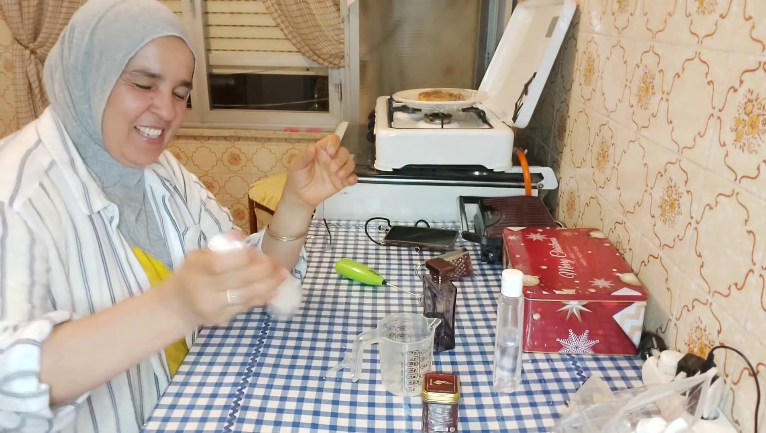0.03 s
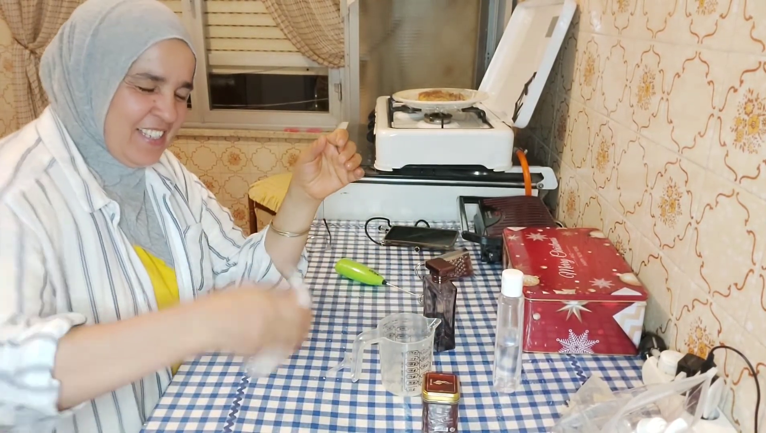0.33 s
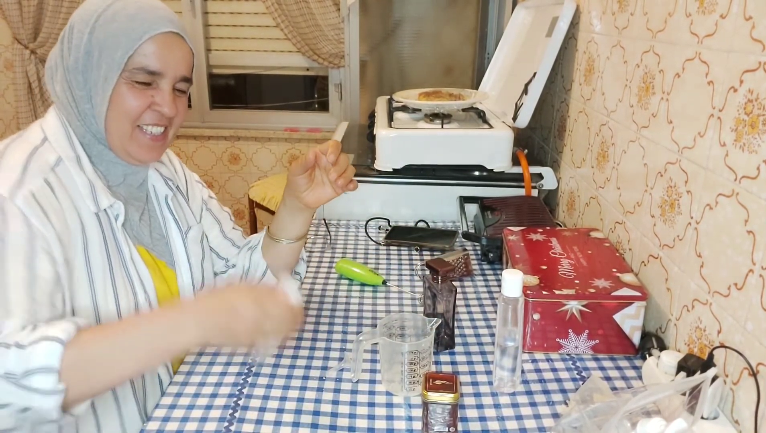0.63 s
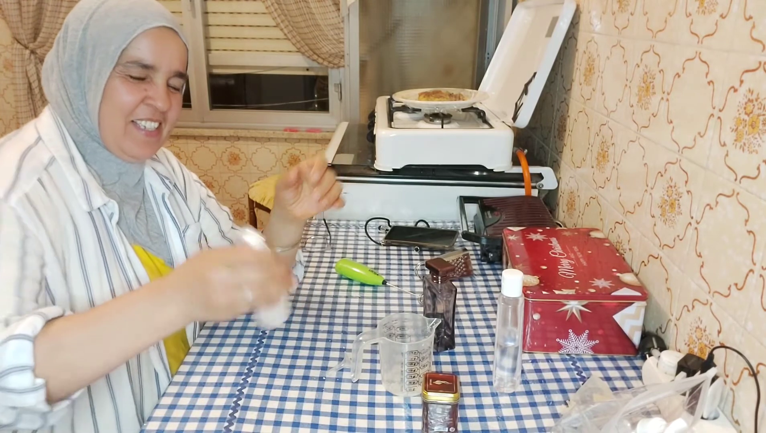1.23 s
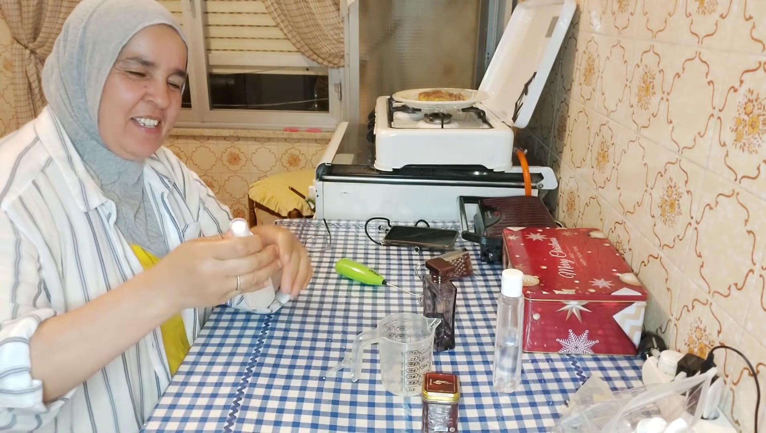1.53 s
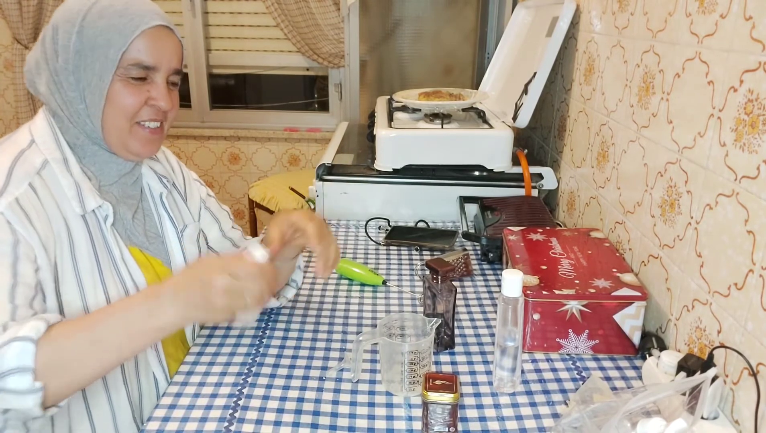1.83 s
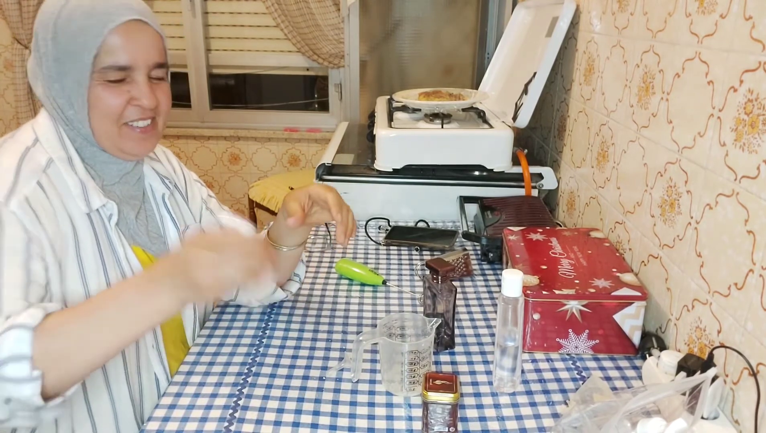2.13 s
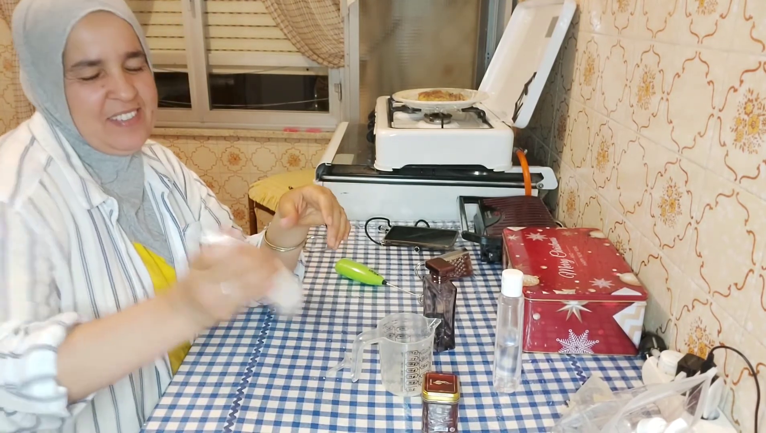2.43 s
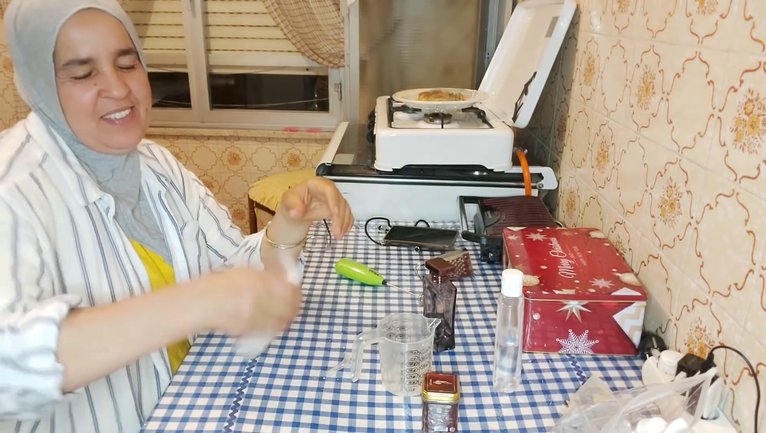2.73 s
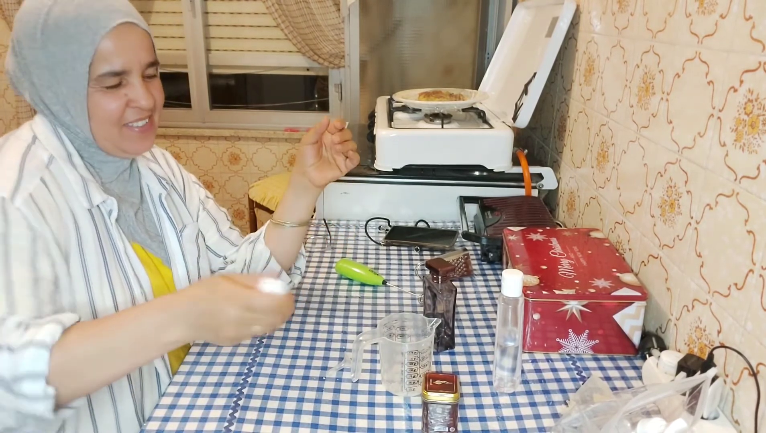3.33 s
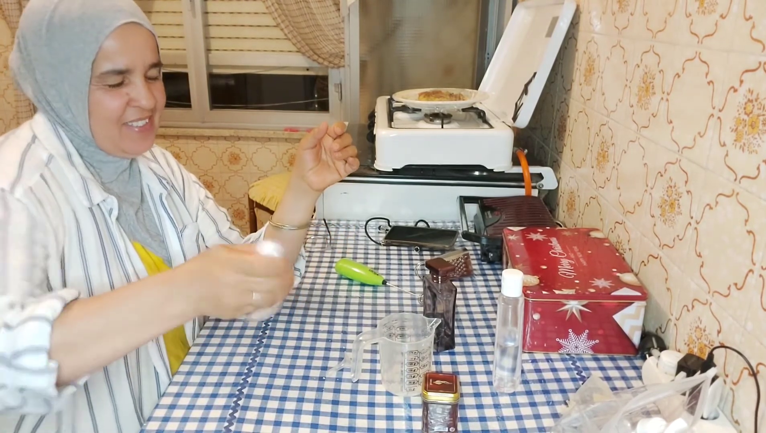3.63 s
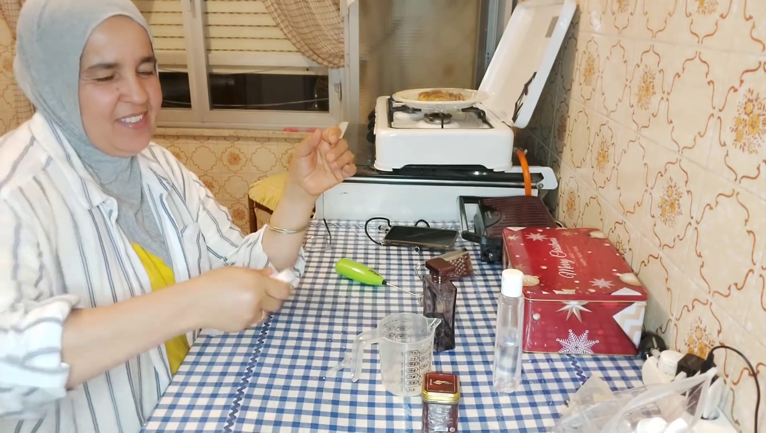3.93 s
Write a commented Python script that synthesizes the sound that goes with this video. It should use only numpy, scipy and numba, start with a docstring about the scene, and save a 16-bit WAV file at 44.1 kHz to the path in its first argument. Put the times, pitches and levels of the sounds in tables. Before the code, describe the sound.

Liquid sloshes sharply in a small shaken plastic bottle, pausing once, in a kitchen.

```python
"""Sharp sloshes, about four a second with one pause: a small plastic bottle of liquid shaken by hand.
At each turn the liquid surges against an end: it slaps, churns into bubbles and sprays the wall,
while the trapped air gulps. In the pause, fingers rub the plastic. The bottle is a little right of
a stereo microphone pair in a hard-walled kitchen, far enough off for the room's short ring to be
about as loud as the direct sound. Behind it lie a low rumble and a faint mains hum."""
import sys
import numpy as np
from scipy import signal
from scipy.fft import rfft, irfft
from scipy.io import wavfile
from scipy.ndimage import map_coordinates
from numba import njit

SR = 44100
rng = np.random.default_rng(int(sys.argv[2]) if len(sys.argv) > 2 else 0)


def dump_mix(stems):
    """Bounce the given channels to the path in sys.argv[1] as a 16-bit WAV at rate SR."""
    frames = np.atleast_2d(stems).T  # one column per channel
    limited = np.clip(frames, -1, 1)  # hard clip at full scale
    pcm = np.round(limited * 32767).astype(np.int16)
    wavfile.write(sys.argv[1], SR, pcm)


N = 176400

# surges of liquid against an end: (time [s], rise [s], length [s], churn level [dB], spray level [dB])
LIQUID_SURGES = [(0.0, 0.00067, 0.016, -43, -46.5), (0.116, .002, 0.073, -50.5, -51),
                 (0.222, .002, 0.028, -46.5, -50.5), (0.35, 0.0036, 0.1, -52, -50),
                 (.433, 0.012, 0.051, -44, -49.5), (0.573, 0.0056, 0.054, -53, -51),
                 (0.613, .006, 0.036, -51, -54), (0.652, 0.0017, 0.064, -47.5, -46.5),
                 (0.801, .003, 0.063, -48.5, -48.5), (0.882, 0.0018, 0.062, -47, -45.5),
                 (1.026, 0.0039, 0.027, -48.5, -46), (1.065, 0.0055, 0.032, -49, -54),
                 (1.105, 0.0023, 0.051, -43, -47.5), (1.229, 0.016, 0.079, -50.5, -55),
                 (1.331, 0.014, 0.048, -50, -57), (2.022, 0.0044, 0.025, -50.5, -58.5),
                 (2.071, .002, 0.097, -48, -52.5), (2.237, 0.0096, 0.052, -46, -48.5),
                 (2.316, 0.0056, 0.068, -45, -48.5), (2.472, 0.0037, 0.081, -48, -49.5),
                 (2.544, 0.028, 0.078, -44.5, -48), (2.712, .014, 0.082, -45, -49),
                 (2.8, 0.0083, 0.067, -45, -51.5), (2.957, 0.013, 0.07, -48, -51),
                 (3.051, 0.0034, 0.046, -46.5, -49), (3.203, 0.0056, 0.088, -49.5, -56),
                 (3.312, .003, .055, -48.5, -56.5), (3.445, .002, 0.038, -59, -56),
                 (3.482, .002, 0.029, -53, -53.5), (3.524, 0.0053, 0.088, -45.5, -53.5),
                 (3.634, 0.014, 0.096, -53.5, -73), (3.671, 0.013, 0.055, -46.5, -50),
                 (3.763, 0.0018, 0.042, -43.5, -48.5), (3.837, 0.011, 0.034, -52, -59),
                 (3.909, 0.0018, 0.15, -47.5, -47)]
# colour of the churning bubbles: (frequency [Hz], relative band level [dB])
CHURN_COLOUR = [(250, -16), (420, -12), (650, -5.5), (900, -11), (1300, -8.5), (1800, 0.5), (2300, 1.5),
                (2800, -3.5), (3700, 0), (5000, -2), (7000, -9.5)]
# colour of the spray on the wall: (frequency [Hz], relative band level [dB])
SPRAY_COLOUR = [(2000, -0.5), (3500, -5), (5000, 0.5), (6100, -3.5), (7300, 1), (9000, -0.5), (12500, -3.5),
                (15000, -52.5)]
# slaps on the wall and ticks of single drops: (time [s], relative level [dB], pitch [Hz])
WALL_SLAPS = [(0.119, -43.5, 7150), (.205, -38, 842), (.208, -34.5, 2000), (0.227, -53, 2350),
              (.226, -40, 860), (0.351, -47, 2130), (.436, -46, 2280), (0.456, -43.5, 2400),
              (.582, -47.5, 7260), (0.645, -35, 2290), (.646, -43, 900), (0.658, -39, 3800),
              (.680, -38, 1620), (.712, -46, 5000), (.806, -44, 870), (0.879, -44, 2900),
              (.888, -36.5, 1670), (1.035, -44.5, 1560), (1.073, -41, 2260), (1.111, -37, 1620),
              (1.127, -60, 1800), (1.344, -52.5, 6500), (1.437, -63, 2220), (2.066, -43, 2050),
              (2.333, -39.5, 1890), (2.345, -37.5, 3530), (2.477, -48, 1030), (3.058, -44, 2720),
              (3.205, -47, 6500), (3.314, -44, 2570), (3.448, -55, 2070), (3.479, -59, 2340),
              (3.525, -49, 790), (3.644, -50, 7160), (3.677, -46.5, 8400), (3.853, -51.5, 9000),
              (3.765, -56, 1930), (3.766, -44.5, 704), (3.920, -34.5, 2240), (3.939, -43, 2250),
              (3.957, -51, 2150)]
# gulps of the air pocket: (time [s], length [s], level [dB], first pitch [Hz], last pitch [Hz])
AIR_GULPS = [(0.0, 0.018, -44, 844, 757), (.205, 0.026, -44.5, 884, 550), (.351, 0.1, -56.5, 580, 935),
             (.45, 0.045, -60.5, 478, 622), (0.606, 0.033, -54, 806, 872), (.645, 0.023, -47, 952, 821),
             (0.807, 0.0283, -47, 703, 616), (.86, 0.033, -52, 925, 765), (1.032, 0.079, -55.5, 780, 1070),
             (1.111, .03, -60, 1018, 877), (1.234, 0.043, -60, 760, 823), (2.025, 0.026, -52, 580, 585),
             (2.239, 0.042, -46, 643, 723), (2.276, 0.044, -52.5, 1122, 1188),
             (2.475, 0.045, -51, 648, 683), (2.499, 0.046, -56.5, 1023, 1195),
             (2.551, 0.039, -48, 935, 637), (2.727, 0.014, -47.5, 643, 686), (2.77, 0.15, -71, 1103, 792),
             (2.955, 0.073, -52.5, 626, 940), (3.197, 0.024, -53, 655, 744), (3.263, 0.074, -56, 1106, 769),
             (3.521, 0.032, -48, 742, 727), (3.558, 0.033, -55, 1000, 618), (3.684, 0.018, -47.5, 727, 779),
             (3.735, 0.068, -51, 920, 680)]
# hollow ring of the bottle: (frequency [Hz], width [Hz], gain [dB])
BOTTLE_RESONANCES = [(452, 72, -2), (897, 54, -11.5), (1832, 23, -14), (2348, 127, -9), (7260, 800, -3)]
# fingers on the plastic: (time [s], length [s], level [dB], pitch [Hz])
FINGER_RUBS = [(1.832, 0.063, -69.5, 1740), (1.876, 0.026, -69, 7000), (1.942, 0.042, -66.5, 4950)]
# how long the kitchen rings: (frequency [Hz], time to fall 60 dB [s])
ROOM_DECAY = [(250, 0.7), (1000, 0.26), (2500, 0.27), (7000, 0.28), (14000, 0.17)]
# how strongly the kitchen rings: (frequency [Hz], gain [dB])
ROOM_COLOUR = [(250, -8), (700, -4), (1200, -4), (2200, -1), (6000, -4.5), (14000, 1)]
# rumble and hiss of the room: (frequency [Hz], relative spectral density [dB])
ROOM_TONE_COLOUR = [(25, -42), (45, -7), (65, -6.5), (130, -4.5), (200, -11.5), (300, -3), (360, -1.5),
                    (415, 0.5), (470, -5), (560, -8.5), (700, -19.5), (1100, -24), (2000, -30), (5000, -37),
                    (8000, -38), (12000, -34.5), (15000, -33.5)]

SAG_DB_PER_S = 50   # slow fade of a surge or gulp while it lasts


def sloshing(drain_db_per_s=355):
    """Each surge of bubbles and spray rises fast, sags while the liquid runs, then drains."""
    power, t = np.zeros((2, N)), np.arange(SR // 3) / SR
    for start, rise, length, *levels in LIQUID_SURGES:
        shape = envelope(t, rise, length, drain_db_per_s)
        for layer, db in zip(power, levels):
            add(layer, start, (shape * from_db(db)) ** 2)
    churn_gain, spray_gain = np.sqrt(power)
    churn = bubbles(CHURN_COLOUR, per_s=4000, cycles=17.9, spread_db=4.0)
    spray = bubbles(SPRAY_COLOUR, per_s=5000, cycles=9.7, spread_db=3.5)
    return churn_gain * churn + spray_gain * spray


def bubbles(colour, per_s, cycles, spread_db, clumps_per_s=130, clump_db=1.9):
    """The liquid breaks in clumps into pops of uneven size, each with its own pitch; rms 1."""
    when, size_draw, pitch_draw = rng.random((int(per_s * N / SR), 3)).T
    low_hz, high_hz = colour[0][0], colour[-1][0]
    hz = low_hz * (high_hz / low_hz) ** pitch_draw
    size_db = spread_db * np.minimum(-np.log(size_draw), 4)   # many small, a few large
    sizes = from_db(size_db + at_hz(colour, hz)) * np.sqrt(hz)   # the root makes up for shorter pops
    clumps = np.interp(np.arange(N) / SR * clumps_per_s, np.arange(N), rng.standard_normal(N))
    fizz = pops((when * N).astype(np.int64), sizes, hz / SR, cycles, glide=0.15)
    return rms_one(fizz * from_db(clump_db * clumps))


@njit
def pops(starts, sizes, pitches, cycles, glide):
    """Each bubble rings as a rising sine that dies by 60 dB; pitches in cycles per sample."""
    out = np.zeros(N)
    for start, size, pitch in zip(starts, sizes, pitches):
        life = cycles / pitch
        for i in range(min(int(life), N - start)):
            age = i / life
            shape = min(i * pitch, 1.) * np.exp(-np.log(1000) * age)
            out[start + i] += size * shape * np.sin(2 * np.pi * pitch * i * (1 + glide * age))
    return out


def slaps(decay_s=0.0021, q=3.46, crack_db=-7, boost_db=13):
    """Liquid hits the wall for milliseconds and rings a broad resonance, with a thin crack on top."""
    out, t = np.zeros(N), np.arange(SR // 30) / SR
    for start, db, hz in WALL_SLAPS:
        burst = rng.standard_normal(len(t)) * np.exp(-t / decay_s)
        body = rms_one(resonance(resonance(burst, hz, hz / q), hz, hz))
        crack = rms_one(resonance(resonance(burst, 2300, 3200), 2500, 5800))
        slap = body + from_db(crack_db) * crack
        peak = np.abs(signal.hilbert(slap)).max()
        add(out, start, from_db(db + boost_db) * slap / peak)
    return out


def gulps(kicks_per_s=300, ring_s=0.0022, flutter_db=-1.5):
    """The air pocket sings a note that glides as it changes size and flutters as the liquid kicks it."""
    out, t = np.zeros(N), np.arange(SR // 6) / SR
    for start, length, db, first_hz, last_hz in AIR_GULPS:
        chance, size, turn = rng.random((3, len(t)))
        kicks = size * (chance < kicks_per_s / SR) * np.exp(2j * np.pi * turn)
        flutter = signal.lfilter([1], [1, -np.exp(-1 / (ring_s * SR))], kicks)
        flutter = signal.sosfilt(signal.butter(1, 350, fs=SR, output="sos"), flutter)
        swing = 1 + from_db(flutter_db) * flutter / (np.std(flutter) + 1e-12)
        hz = np.interp(t, [0, length], [first_hz, last_hz])
        note = np.real(swing * np.exp(2j * np.pi * np.cumsum(hz) / SR))
        gulp = note * envelope(t, rise_s=0.0018, length_s=length, release_db_per_s=900)
        add(out, start, from_db(db) * rms_one(gulp) * np.sqrt(length / t[-1]))
    return out


def bottle_ring(liquid):
    """The liquid sets the hollow bottle ringing."""
    return sum(from_db(db) * resonance(liquid, hz, width) for hz, width, db in BOTTLE_RESONANCES)


def finger_rubs(q=3, attack_s=0.002):
    """The grip changes: soft, narrow friction noise that fades as the fingers settle."""
    out, t = np.zeros(N), np.arange(SR // 5) / SR
    for start, length, db, hz in FINGER_RUBS:
        friction = rms_one(resonance(resonance(rng.standard_normal(len(t)), hz, hz / q), hz, hz))
        shape = np.minimum(t / attack_s, 1) * np.exp(-(t / length) ** 2)
        add(out, start, from_db(db) * friction * shape)
    return out


def direct_path(bottle, left_lag_s=47e-6, sway_s=30e-6, shake_hz=4.2):
    """The sound reaches the left microphone later, by a lag that sways with the swing of the hand."""
    t = np.arange(N) / SR
    lag = left_lag_s + sway_s * np.sin(2 * np.pi * shake_hz * t)
    left = map_coordinates(bottle, [(t - lag) * SR], order=3)
    return np.array([left, bottle])


def kitchen(bottle, places=5, places_per_s=23, first_echo_s=0.0026):
    """Dense reflections, different at each microphone and bottle position; the bass rings longest."""
    t, hz = np.arange(SR // 2) / SR, np.fft.rfftfreq(SR // 2, 1 / SR)
    white, responses = rfft(rng.standard_normal((places, 2, len(t)))), 0
    centres = np.geomspace(200, 16000, 8)
    for centre, pick in zip(centres, np.eye(len(centres))):
        decay = from_db(-60 * t / at_hz(ROOM_DECAY, centre)) * (t > first_echo_s)
        band = irfft(white * np.interp(hz, centres, pick), len(t))
        responses += band * decay / np.linalg.norm(decay) * from_db(at_hz(ROOM_COLOUR, centre))
    place, out = np.arange(N) / SR * places_per_s, 0
    for k, response in enumerate(responses):   # the moving bottle fades from one pattern to the next
        nearness = np.maximum(1 - np.abs((place - k) % places - places / 2), 0)
        out += signal.fftconvolve((bottle * np.sqrt(nearness))[None], response, axes=1)[:, :N]
    return out


def room_tone(mid_db=-65.5, side_db=-70, hum_hz=97, hum_db=-74.5):
    """Steady rumble and thin hiss, spread across the pair, with a faint mains hum."""
    colour = from_db(at_hz(ROOM_TONE_COLOUR, np.fft.rfftfreq(N, 1 / SR)))
    mid, side = rms_one(irfft(rfft(rng.standard_normal((2, N))) * colour, N))
    hum = np.sqrt(2) * np.sin(2 * np.pi * hum_hz * np.arange(N) / SR)
    return from_db(mid_db) * mid + from_db(side_db) * side * [[1], [-1]] + from_db(hum_db) * hum


def envelope(t, rise_s, length_s, release_db_per_s):
    """A straight rise, a slow sag, and a fast release once the length is up."""
    fall_db = SAG_DB_PER_S * t + release_db_per_s * np.maximum(t - length_s, 0)
    return np.minimum(t / rise_s, 1) * from_db(-fall_db)


def resonance(x, hz, width_hz):
    """Two-pole resonance with gain 1 at its peak."""
    r = np.exp(-np.pi * width_hz / SR)
    feedback = [1, -2 * r * np.cos(2 * np.pi * hz / SR), r * r]
    return signal.lfilter(np.array([1, 0, -1]) * (1 - r * r) / 2, feedback, x + 1e-18)


def from_db(db):
    """Decibels to gain."""
    return 10 ** (np.asarray(db) / 20)


def rms_one(x):
    """Scale to unit rms."""
    return x / np.sqrt(np.mean(x ** 2) + 1e-20)


def at_hz(table, hz):
    """Read a table on a log-frequency axis."""
    frequencies, values = np.transpose(table)
    return np.interp(np.log(hz + 1e-9), np.log(frequencies), values)


def add(out, start_s, sound):
    """Mix a sound in at a time."""
    i = int(start_s * SR)
    out[i:i + len(sound)] += sound[:N - i]


def scene(direct_db=-4, right_bias_db=1.2):
    """The shaken bottle and the kitchen at the microphone pair, a little louder on the right."""
    liquid = sloshing() + slaps() + gulps()
    bottle = liquid + bottle_ring(liquid) + finger_rubs()
    at_pair = from_db(direct_db) * direct_path(bottle) + kitchen(bottle) + room_tone()
    return at_pair * from_db([[-right_bias_db / 2], [right_bias_db / 2]])


def record(dry):
    """A steep low-pass cuts the treble above 15.4 kHz."""
    return signal.sosfilt(signal.ellip(10, .1, 80, 15400, fs=SR, output="sos"), dry)


dry = scene()
out = record(dry)
dump_mix(out)
```